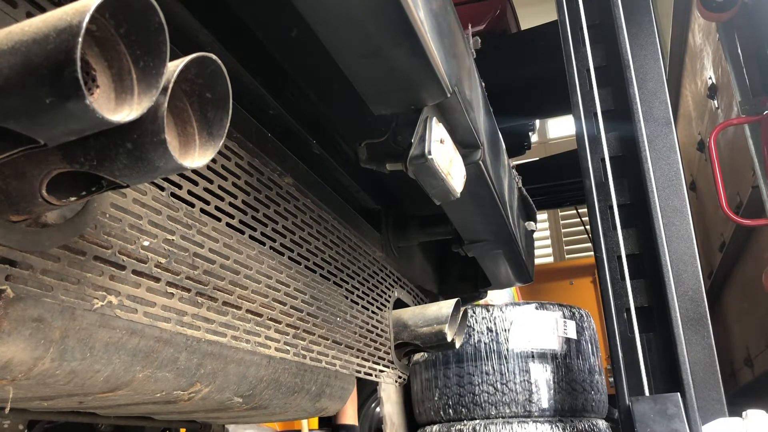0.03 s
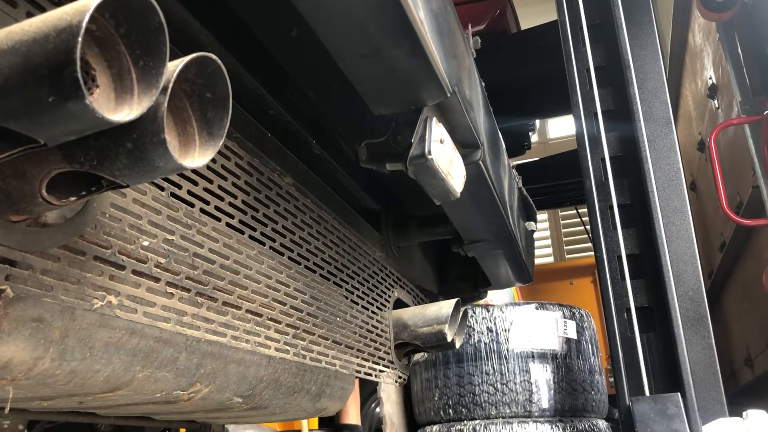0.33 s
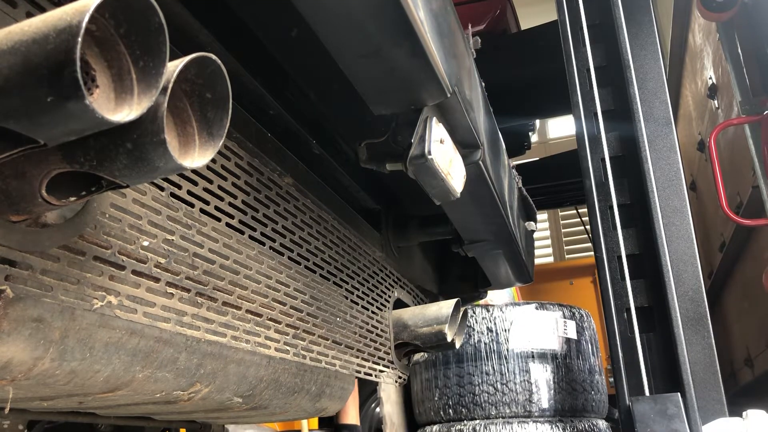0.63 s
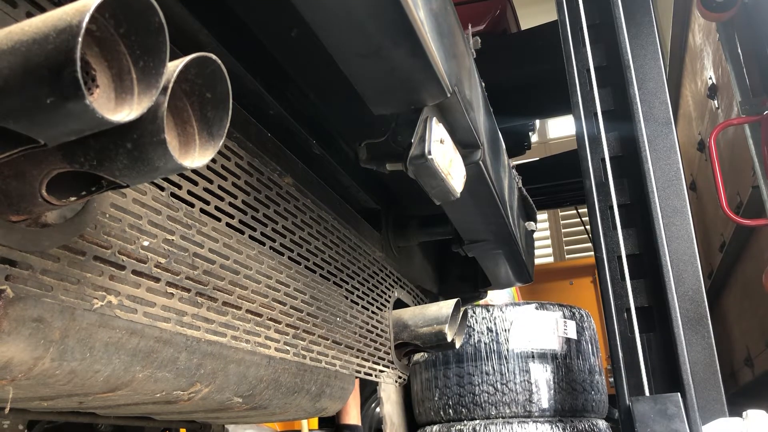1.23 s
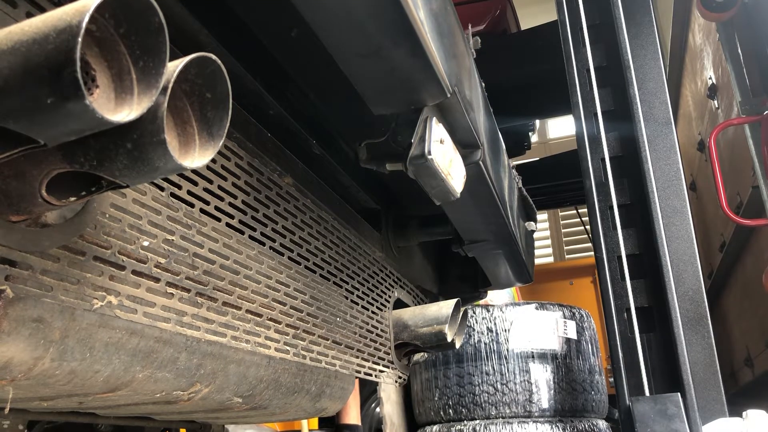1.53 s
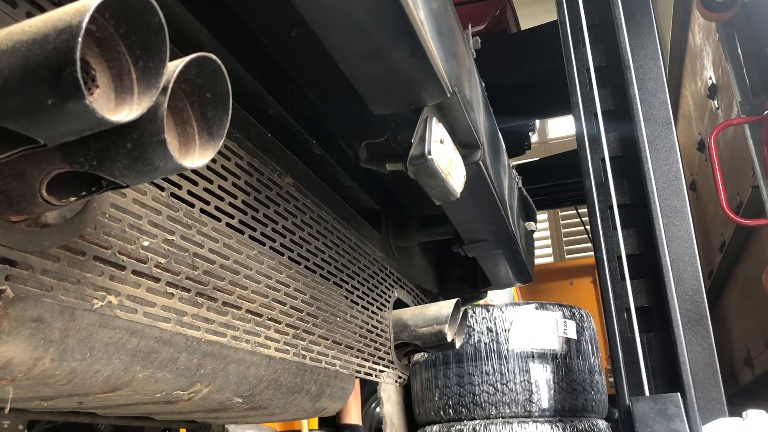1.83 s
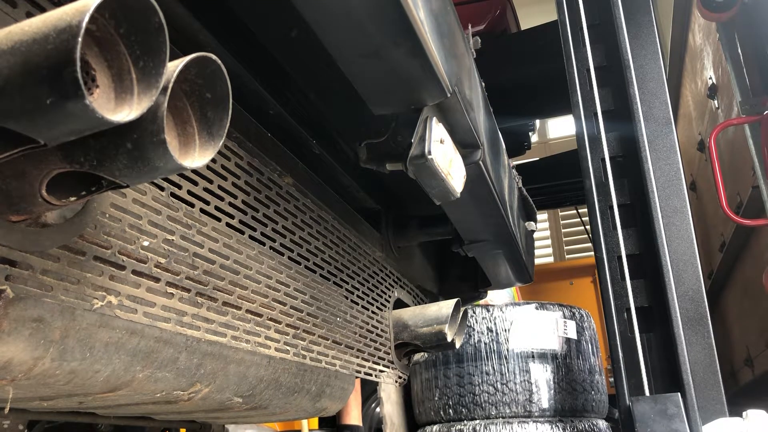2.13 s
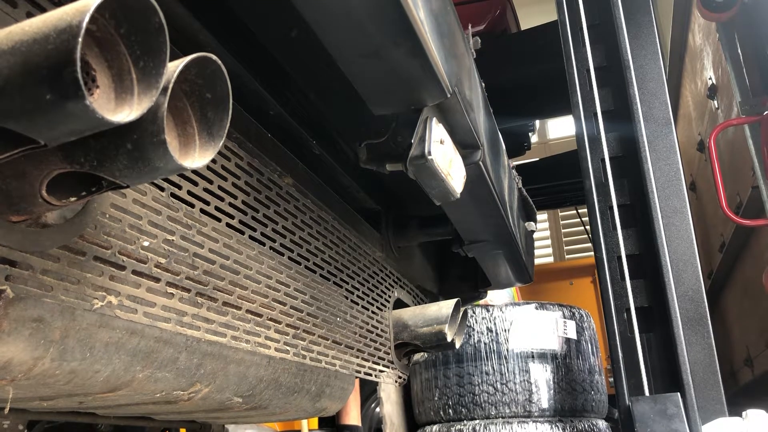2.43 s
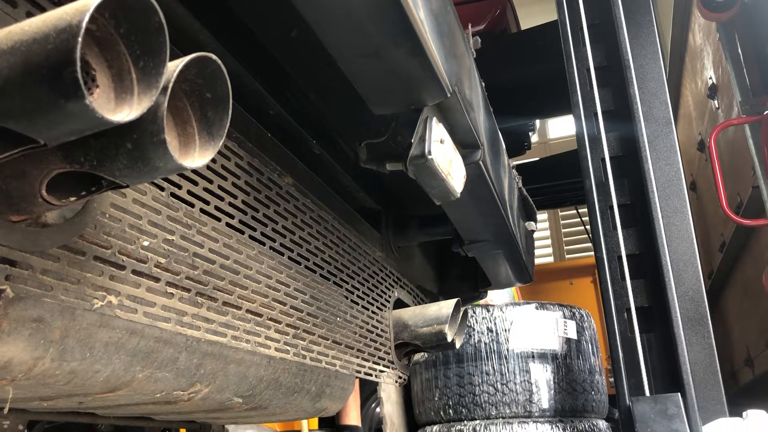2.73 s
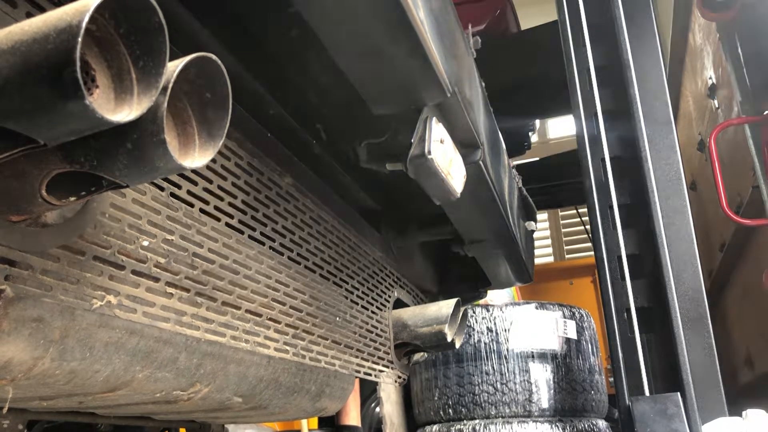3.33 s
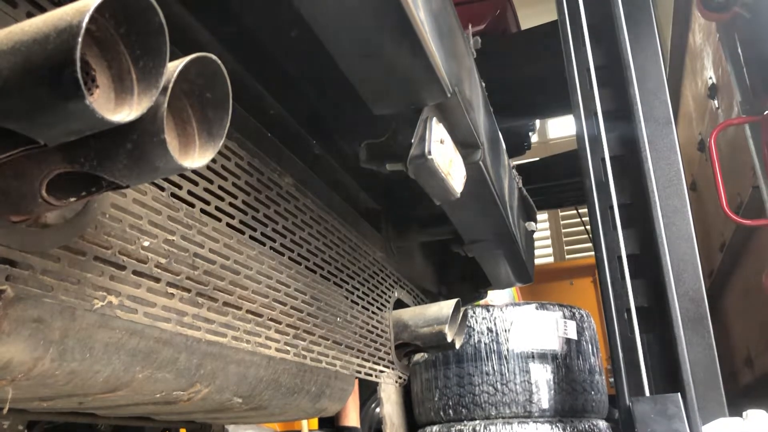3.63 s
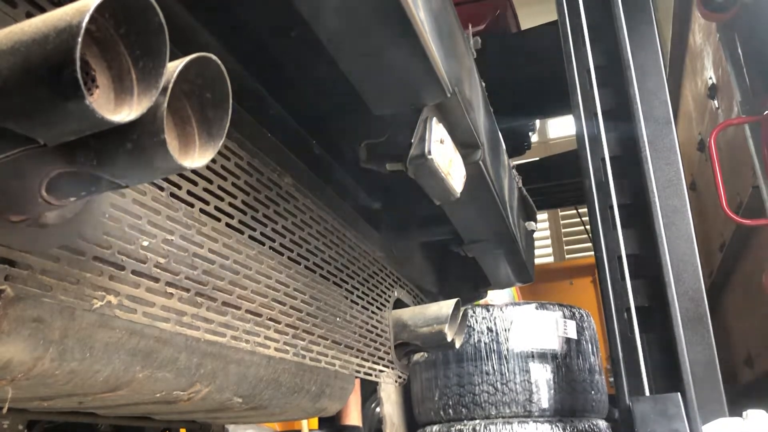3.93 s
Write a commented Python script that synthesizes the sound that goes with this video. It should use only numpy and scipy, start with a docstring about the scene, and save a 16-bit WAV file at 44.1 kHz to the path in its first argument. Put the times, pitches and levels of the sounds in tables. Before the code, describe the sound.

A car engine starts, heard close to the tailpipes. At first there is only a low workshop hum, with a soft air hiss from 0.3 to 0.7 seconds. At 2.3 seconds the starter clacks in and grinds, rising in pitch through five low chuffs. At 3 seconds the engine catches, running loud and rough with rapid deep thumps, sharp spits and clatter until 4 seconds, while the starter whines down.

```python
"""In a workshop, under a car on a lift, right beside the tailpipes.
Over a low hum comes a short hiss of air. The starter clacks in and grinds through five compressions,
each pushing a chuff of air out of the exhaust. Then the engine catches: every firing is a sharp spit
and a deep thump from the exhaust, over mechanical clatter, while the starter whines down."""
import sys
import numpy as np
from scipy import signal
from scipy.fft import rfft, irfft
from scipy.io import wavfile
from scipy.ndimage import uniform_filter1d

SR = 44100
rng = np.random.default_rng(int(sys.argv[2]) if len(sys.argv) > 2 else 0)


def inscribe(sig):
    """Save sig as 16-bit PCM at rate SR to the path in sys.argv[1].

    A 1-D sig is mono; a 2-D sig holds one channel per row.
    Samples are clipped to [-1, 1] before scaling.
    """
    pcm = np.round(np.clip(np.atleast_2d(sig).T, -1, 1) * 32767)
    wavfile.write(sys.argv[1], SR, pcm.astype(np.int16))


N = 176400
T = np.arange(N) / SR

# steady background noise of the workshop: pitch_hz, level_db
BACKGROUND_COLOUR = [(20, -42), (43, -15), (68, -7), (87, -13), (123, -2.5), (153, -12.5), (200, -10.5),
                     (326, -13.5), (400, -17), (1000, -22), (2000, -30), (5400, -37.5), (6600, -27.5),
                     (8100, -40.5), (12000, -46.5), (16000, -43)]
# tones of the hum: pitch_hz, width_hz, level_db
HUM_TONES = [(58.46, 6, -62), (122.7, 8, -68), (453, 15, -74.5)]
# faint pulsing shrill, like an insect outside: pitch_hz, width_hz, level_db, peak_s
SHRILL_TONES = [(6380, 64, -74.5, 1.254), (6800, 140, -75, 1.247)]
# time the room's echo takes to fade by 60 dB: pitch_hz, fade_s
ECHO_FADE = [(100, 1), (1000, 1), (5000, 0.71), (15000, 0.5)]
# hiss of air: pitch_hz, level_db
AIR_COLOUR = [(59, -35), (100, 0), (124, -1), (177, 4), (234, -2), (308, -7), (365, 5.5), (502, -8),
              (970, -1), (1030, -3), (2750, -1.5), (2930, -2), (3250, -3), (5080, -2), (8640, -5),
              (12700, -3), (16000, -8.5)]
# low knocks of the air valve: start_s, level_db, pitch_hz, rise_s, fall_s
VALVE_KNOCKS = [(0.406, -46.5, 231, 0.042, 0.025), (.675, -52.5, 173, .012, 0.027)]
# knocks of the starter gear moving in and out: start_s, level_db, rise_s, fall_s, tilt_db_per_octave
STARTER_KNOCKS = [(2.331, -26, 0.0087, 0.025, -1.5), (2.342, -15, 0.0068, .013, -1.5),
                  (2.358, -13, 0.001, 0.023, -5.5), (3.288, -19, 0.015, 0.024, -3)]
# tone of those knocks: pitch_hz, level_db
KNOCK_COLOUR = [(50, -45), (150, -9.5), (400, -11.5), (950, -5), (1600, 1.5), (2600, -1.5), (4000, 0.5),
                (6500, -2.5), (9000, -6.5), (16000, -15)]
# how fast the starter's gear teeth meet: time_s, pitch_hz
TOOTH_RATE = [(2.345, 200), (2.39, 341), (2.46, 425.5), (2.54, 498), (2.61, 571), (2.67, 604), (2.87, 704),
              (2.95, 730), (3.15, 902), (3.38, 1002)]
# notes the starter's housing rings at: pitch_hz, width_hz, level_db
HOUSING_MODES = [(504.3, 12, -0.5), (809.4, 12, 3.5), (859, 23, 3), (959, 37, 9.5), (953, 8.3, 6.5),
                 (1010, 9.4, -30), (1270, 13, -1.5), (1410, 12, -2.5), (2150, 13, -5)]
# loudness of the teeth and the ringing housing: time_s, level_db
WHIRR_LEVEL = [(2.335, -70), (2.36, -17), (2.41, -18), (2.46, -20), (2.49, -15.5), (2.515, -19),
               (2.545, -16), (2.57, -25), (2.68, -28), (2.73, -24), (2.85, -25), (2.872, -21), (2.92, -22),
               (2.96, -32), (3.25, -30), (3.3, -22), (3.37, -50)]
# scraping of the gears: pitch_hz, level_db
SCRAPE_COLOUR = [(60, -3), (150, 5), (370, -4.5), (600, 4.5), (900, 2.5), (1130, -3.5), (1450, 2.5),
                 (1750, -2.5), (2150, 0.5), (2900, -3), (3700, 1.5), (5100, -6.5), (7100, -9.5),
                 (9000, -14), (12000, -23), (16000, -42)]
# loudness of the scraping: time_s, level_db
SCRAPE_LEVEL = [(2.335, -74), (2.37, -28.5), (2.45, -38.5), (2.6, -30), (2.8, -30), (2.92, -28.5),
                (2.98, -29), (3.15, -24.5), (3.3, -21.5), (3.36, -48), (3.5, -88)]
# higher notes the starter's housing rings at: pitch_hz, width_hz, level_db
UPPER_HOUSING_MODES = [(1690, 25, 6), (2060, 25, 7), (2630, 25, 9), (2870, 25, 7), (3290, 25, 8), (3670, 25, 4),
                       (3810, 30, 6), (4330, 30, 6), (7150, 90, 7)]
# whine of the starter slowing down: time_s, pitch_hz, level_db
SLOWING_WHINE = [(3.3, 6550, -66), (3.6, 5710, -44.5), (3.8, 4550, -46.5), (3.88, 4410, -37.5),
                 (4.0, 4160, -37)]
# air pushed out by each compression while the starter turns the engine: start_s, level_db
COMPRESSIONS = [(2.464, -16.5), (2.607, -12.5), (2.721, -16), (2.830, -14.5), (2.934, -12.5)]
# each time a cylinder fires: start_s, thump_db, spit_db
ENGINE_FIRINGS = [(2.995, -5, -6), (3.054, -1, -1.5), (3.1, -1, -1.5), (3.142, -2.5, -3),
                  (3.176, -1, -10.5), (3.212, 0, -5), (3.250, -6, -13), (3.287, -8.5, -7), (3.318, -2, -29),
                  (3.353, 0.5, -8), (3.384, -0.5, -7), (3.414, -5, -29), (3.447, -1.5, -11),
                  (3.484, 1.5, -9.5), (3.515, -1, -7.5), (3.557, -3, -37), (3.593, -6, -17), (3.62, 0, -11),
                  (3.653, -1, -13), (3.687, -1.5, -13), (3.722, -7.5, -20), (3.763, -24, -31),
                  (3.794, -2.5, -12), (3.835, -3.5, -17.5), (3.876, -5.5, -20), (3.912, -6.5, -18),
                  (3.939, -3, -13.5), (3.976, -8, -29)]
# sharp spit that opens a firing: pitch_hz, level_db
SPIT_COLOUR = [(100, -10), (700, 9.5), (1700, 3), (3000, -2), (4500, -7.5), (6000, 1.5), (8500, -10),
               (13000, -3.5), (16000, -8)]
# swirling gas of a firing: pitch_hz, level_db
GAS_COLOUR = [(40, -35), (110, 6), (220, 7.5), (320, -3), (480, -1.5), (800, -7), (1500, -16), (4000, -20),
              (16000, -55)]
# clatter of the running engine: pitch_hz, level_db
CLATTER_COLOUR = [(180, 6), (300, -2), (494, -6), (528, -12), (814, -1.5), (900, -5.5), (1460, -7),
                  (1900, -7), (2250, -12), (2440, -9.5), (4020, -20), (5800, -20.5), (9710, -29),
                  (13800, -51), (16000, -32)]
# loudness of the clatter: time_s, level_db
CLATTER_LOUDNESS = [(2.95, -33.5), (3.05, -26), (3.2, -25), (3.35, -23), (3.7, -22.5), (3.8, -24),
                    (4.0, -26)]
# notes the engine block rings at: pitch_hz, width_hz, level_db
BLOCK_MODES = [(640, 23, -18), (868, 13, 0.5), (1010, 37, -2.5), (1190, 23, -17), (1333, 18, -4),
               (1958, 48, 4.5), (2140, 54, 1), (3073, 31, 0.5), (3810, 20, 9), (5790, 110, -16)]
# short bark of the tailpipe just before each thump: pitch_hz, level_db
BARK_COLOUR = [(30, -20), (90, -7.5), (130, -17), (175, -13.5), (215, 2.5), (255, -7), (300, -27),
               (450, -19), (700, -15.5), (2000, -58), (5000, -90)]
# how the exhaust pipe shapes a thump: pitch_hz, level_db
PIPE_COLOUR = [(15, -59), (28, -20), (38, -22), (47, 2), (58, 3.5), (72, 3.5), (86, -3.5), (120, -8),
               (165, -16), (230, -22.5), (300, -32.5), (600, -48), (1500, -71), (5000, -93)]


def amp(db):
    """Turns decibels into a number to multiply by."""
    return 10 ** (np.asarray(db) / 20)


def unit(x):
    """Scales a sound to an average (rms) level of 1."""
    return x / np.sqrt(np.mean(x ** 2) + 1e-20)


def curve(rows, column=1):
    """Joins a table's points with straight lines over time."""
    rows = np.array(rows)
    return np.interp(T, rows[:, 0], rows[:, column])


def read(points, hz):
    """Looks up a table's value at any pitch, on a scale of octaves."""
    pitches, values = np.transpose(points)
    return np.interp(np.log(hz + 1), np.log(pitches + 1), values)


def colour(x, points, tilt_db=0):
    """Sets how strong each pitch is, tilted by tilt_db per octave; the result has level 1."""
    hz = np.fft.rfftfreq(N, 1 / SR)
    return unit(irfft(rfft(x) * amp(read(points, hz) + tilt_db * np.log2(hz + 1)), N))


def noise(points, tilt_db=0):
    """Noise with a given colour, or balance of low and high."""
    return colour(rng.standard_normal(N), points, tilt_db)


def wander(rate_hz):
    """A smooth random wobble, up to about rate_hz fast."""
    hz = np.fft.rfftfreq(N, 1 / SR)
    return unit(irfft(rfft(rng.standard_normal(N)) * np.exp(-(hz / rate_hz) ** 2), N))


def burst(start_s, rise_s, fall_s):
    """A level that climbs in a straight line, then dies away."""
    return np.clip((T - start_s) / rise_s, 0, 1) * np.exp(-np.maximum(T - start_s - rise_s, 0) / fall_s)


def resonate(x, hz, width_hz, order=1):
    """Rings at one steady or gliding pitch; a narrower width rings longer."""
    turn = np.exp(2j * np.pi * np.cumsum(hz * np.ones(N)) / SR)
    decay = np.exp(-np.pi * width_hz / SR)
    shifted = x / turn + 1e-18  # move the pitch to 0 Hz, smooth, then move it back
    for _ in range(order):
        shifted = signal.lfilter([1 - decay], [1, -decay], shifted)
    return 2 * (turn * shifted).real


def modes(x, table):
    """Lets a sound ring all the notes of a solid object."""
    return sum(amp(db) * resonate(x, hz, width) for hz, width, db in table)


def fuzzy_tone(hz, width_hz):
    """Noise narrowed down to nearly one pitch."""
    return unit(resonate(rng.standard_normal(N), hz, width_hz, order=2))


def ring(x, points, size=16384):
    """Follows each click with a ringing of the given colour."""
    log_gain = np.log(amp(read(points, abs(np.fft.fftfreq(size, 1 / SR)))))
    response = np.fft.ifft(np.exp(np.conj(signal.hilbert(log_gain)))).real
    return signal.fftconvolve(x, response[:size // 2])[:N]


def workshop(background_db=-58.5, swell=0.7, pulse_s=0.305):
    """Soft steady noise, a low hum and a faint pulsing shrill."""
    hum = sum(amp(db) * fuzzy_tone(hz, width) for hz, width, db in HUM_TONES)
    shrill = sum(amp(db) * fuzzy_tone(hz, width) * (1 + swell * np.cos(2 * np.pi * (T - peak) / pulse_s))
                 for hz, width, db, peak in SHRILL_TONES)
    return amp(background_db) * noise(BACKGROUND_COLOUR) + hum + shrill


def room_echo(x, level_db=-15, delay_s=0.012, size=256):
    """The room answers with a blurred echo whose high notes fade first."""
    hz, t, bands = signal.stft(rng.standard_normal(SR) * (T[:SR] > delay_s), SR, nperseg=size)
    fade = amp(-60 * t / read(ECHO_FADE, hz)[:, None])
    tail = signal.istft(bands * fade, SR, nperseg=size)[1]
    return amp(level_db) * signal.fftconvolve(x, tail / np.linalg.norm(tail))[:N]


def air_valve(start_s=0.347, end_s=0.663, rise_s=0.0069, fall_s=0.035, hiss_db=-42, sag_db_per_s=-4.5):
    """A valve hisses for a third of a second and knocks twice; a faint tick follows."""
    opening = np.clip((T - start_s) / rise_s, 0, 1) * np.exp(-np.maximum(T - end_s, 0) / fall_s)
    tick = amp(-60) * burst(1.012, rise_s, fall_s=0.029) * noise(KNOCK_COLOUR, tilt_db=-1)
    knocks = sum(amp(db) * burst(start, rise, fall) * fuzzy_tone(hz, width_hz=59)
                 for start, db, hz, rise, fall in VALVE_KNOCKS)
    hiss = opening * amp(hiss_db + sag_db_per_s * (T - start_s)) * noise(AIR_COLOUR)
    return hiss + tick + knocks


def solenoid(rattle_db=-0.5, rattle_hz=600, ring_db=3):
    """A magnet throws the starter gear into the flywheel; later it drops out. Both ring the housing."""
    knocks = sum(amp(db) * burst(start, rise, fall) * noise(KNOCK_COLOUR, tilt)
                 for start, db, rise, fall, tilt in STARTER_KNOCKS)
    knocks *= amp(rattle_db * wander(rattle_hz))
    return knocks + amp(ring_db) * modes(knocks, HOUSING_MODES)


def gear_scrape(teeth_passed, gear_teeth=9, worn=0.37, uneven_db=4, flutter_db=1, flutter_hz=300):
    """Worn teeth scrape alike on every turn, so the rasp rises with speed; it rings the upper housing."""
    size, count = 2048, 128  # points around the gear, overtones
    overtones = amp(uneven_db * rng.standard_normal(count)) * np.exp(2j * np.pi * rng.random(count))
    wear = np.interp(teeth_passed / gear_teeth, np.arange(size) / size, irfft(overtones, size), period=1)
    rasp = worn * colour(wear, SCRAPE_COLOUR) + (1 - worn) * noise(SCRAPE_COLOUR)
    rasp *= amp(flutter_db * wander(flutter_hz))
    level = amp(curve(SCRAPE_LEVEL)) * (T > SCRAPE_LEVEL[0][0])
    return level * unit(rasp + modes(rasp, UPPER_HOUSING_MODES))


def starter(whirr_db=-2, teeth_db=-16, rough=0.33, chatter_db=2, chatter_hz=110, jitter=0.00976):
    """Gear teeth strike unevenly and ring the housing; the gears scrape, then the motor spins down."""
    teeth_passed = np.cumsum(curve(TOOTH_RATE) * (1 + jitter * wander(rate_hz=81))) / SR
    teeth = unit(sum(np.cos(2 * np.pi * k * teeth_passed) / np.sqrt(k) for k in range(1, 7)))
    housing = modes((1 - rough) * teeth + rough * 10 * rng.standard_normal(N), HOUSING_MODES)
    housing /= np.sqrt(abs(uniform_filter1d(housing ** 2, size=1500)) + 1e-12)  # even out the level
    level = amp(curve(WHIRR_LEVEL) + chatter_db * wander(chatter_hz)) * (T > WHIRR_LEVEL[0][0])
    whirr = amp(whirr_db) * level * (housing + amp(teeth_db) * teeth)
    whine_level = amp(curve(SLOWING_WHINE, column=2)) * (T > SLOWING_WHINE[0][0])
    whine = whine_level * fuzzy_tone(curve(SLOWING_WHINE), width_hz=170)
    return whirr + gear_scrape(teeth_passed) + whine


def clatter(grain_db=1, grain_hz=250, swell=0.13):
    """Moving engine parts make a grainy clatter that swells with each firing."""
    beats = sum(burst(start, rise_s=0.002, fall_s=0.045) for start, _, _ in ENGINE_FIRINGS)
    grains = unit(noise(CLATTER_COLOUR) * amp(grain_db * wander(grain_hz)))
    level = amp(curve(CLATTER_LOUDNESS)) * (T > CLATTER_LOUDNESS[0][0])
    return grains * level * (1 - swell + 2 * swell * beats)


def engine(spit_db=-16.5, gas_db=-24.5, gas_lag_s=0.0038, block_db=-3, whistle_start_s=3.5):
    """Each firing spits and blows gas; spits and clatter ring the block, and a thin whistle joins in."""
    spits = sum(amp(db) * burst(start, rise_s=0.002, fall_s=0.02) for start, _, db in ENGINE_FIRINGS)
    gusts = sum(amp(db / 2) * burst(start + gas_lag_s, rise_s=0.006, fall_s=0.017)
                for start, db, _ in ENGINE_FIRINGS)
    metal = clatter() + amp(spit_db) * spits * noise(SPIT_COLOUR)
    whistle = amp(-54) * fuzzy_tone(hz=11200, width_hz=46) * (T > whistle_start_s)
    gas = amp(gas_db) * gusts * noise(GAS_COLOUR)
    return metal + amp(block_db) * modes(metal, BLOCK_MODES) + gas + whistle


def exhaust(chuff_db=50.5, bark_db=28.5, thump_db=47.5, bark_lag_s=0.00836, thump_lag_s=0.01272):
    """Compressions give dry chuffs; each firing barks from the tailpipe, then thumps in the silencer."""
    barks, thumps, puffs = np.zeros((3, N))  # one click for each push of gas
    for start, db, _ in ENGINE_FIRINGS:
        barks[round((start + bark_lag_s) * SR)] += amp(db / 2)
        thumps[round((start + thump_lag_s) * SR)] += amp(db)
    for start, db in COMPRESSIONS:
        puffs[round(start * SR)] -= amp(db)
    chuffs = amp(chuff_db) * resonate(puffs, hz=64, width_hz=51, order=3)
    return chuffs + amp(thump_db) * ring(thumps, PIPE_COLOUR) + amp(bark_db) * ring(barks, BARK_COLOUR)


def scene():
    """The car in the workshop; the tailpipes are close by and get no echo."""
    machinery = engine() + starter() + solenoid() + air_valve()
    return (machinery + room_echo(machinery) + exhaust() + workshop())[None]


def record(dry, ceiling=1.0, hardness=6, top_hz=15900):
    """Gently rounds off the loudest peaks, then cuts the very highest treble."""
    rounded = dry / (1 + abs(dry / ceiling) ** hardness) ** (1 / hardness)
    treble_cut = signal.firwin(511, top_hz, window=("kaiser", 9), fs=SR)
    return signal.oaconvolve(rounded, treble_cut[None], "same")


dry = scene()
out = record(dry)
inscribe(out)
```